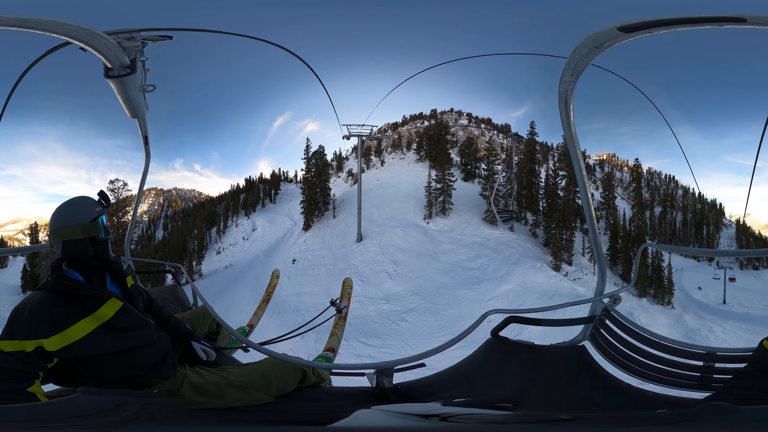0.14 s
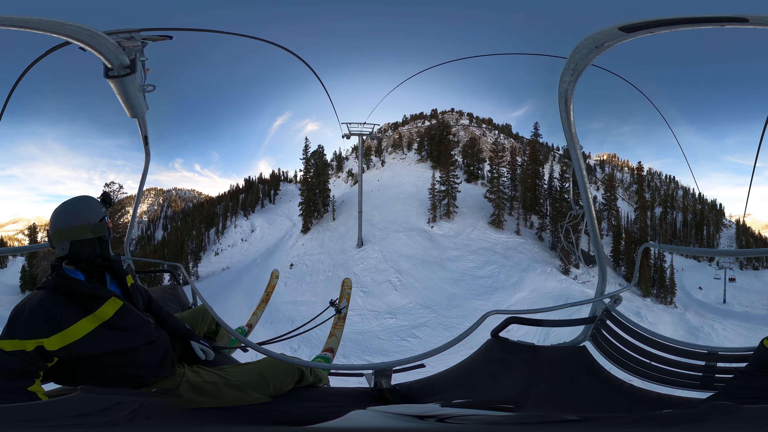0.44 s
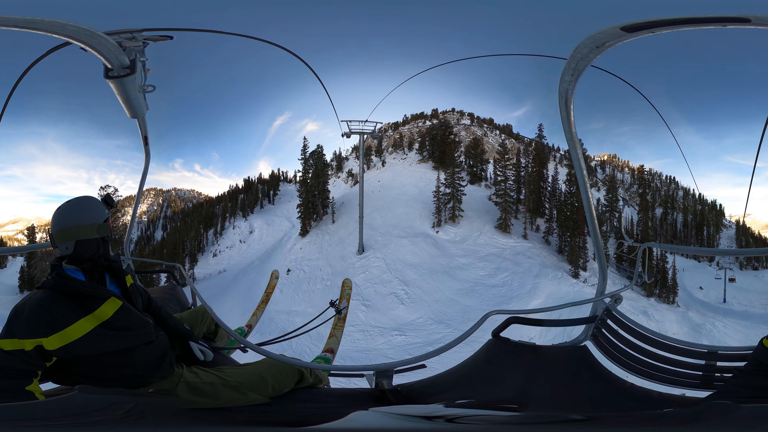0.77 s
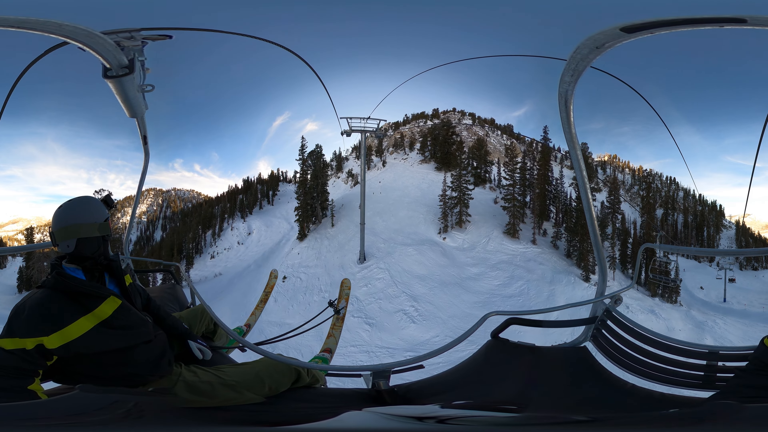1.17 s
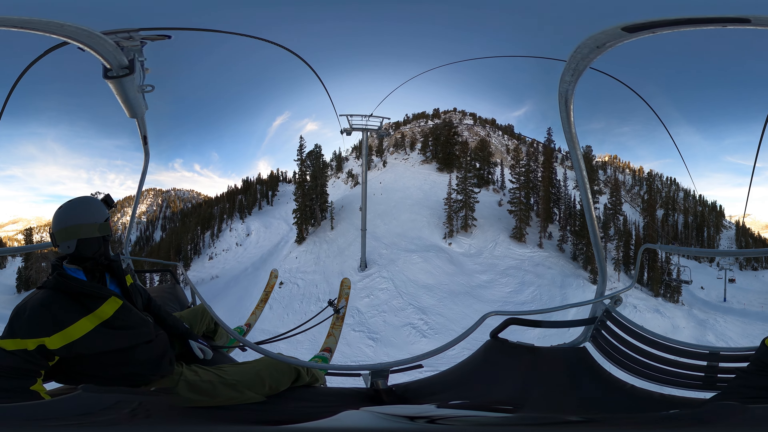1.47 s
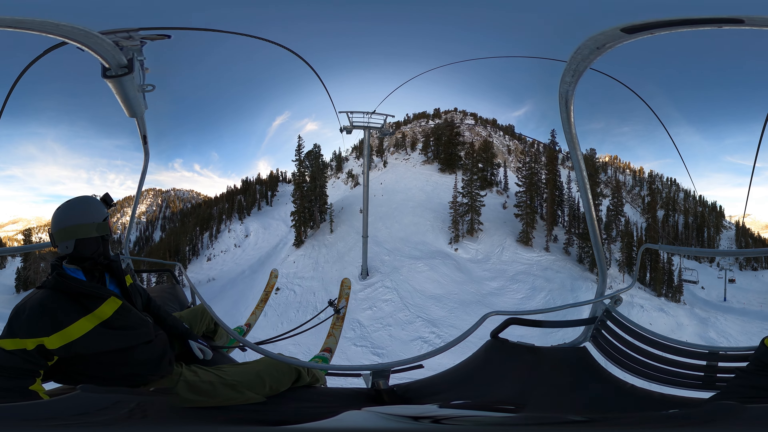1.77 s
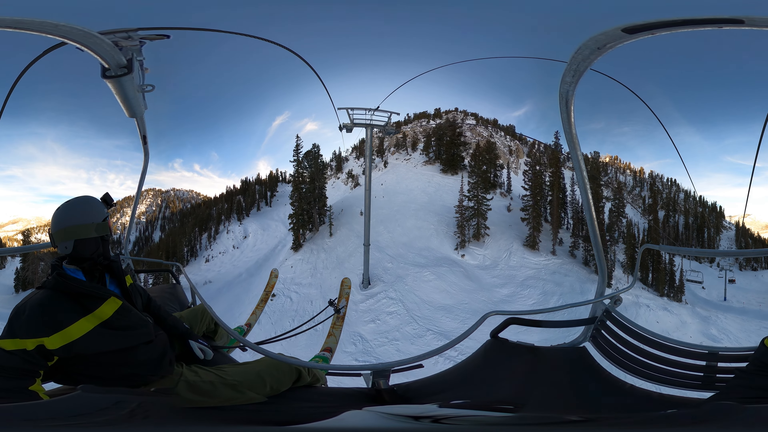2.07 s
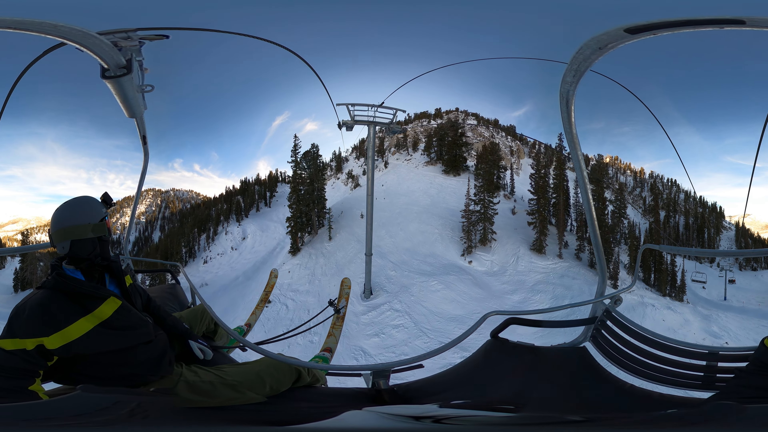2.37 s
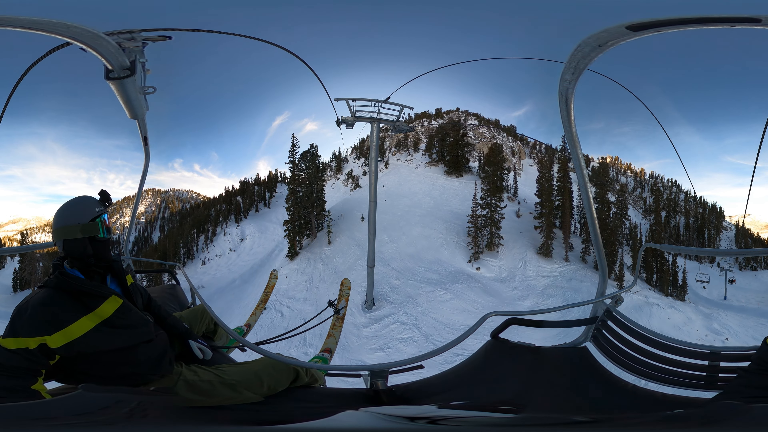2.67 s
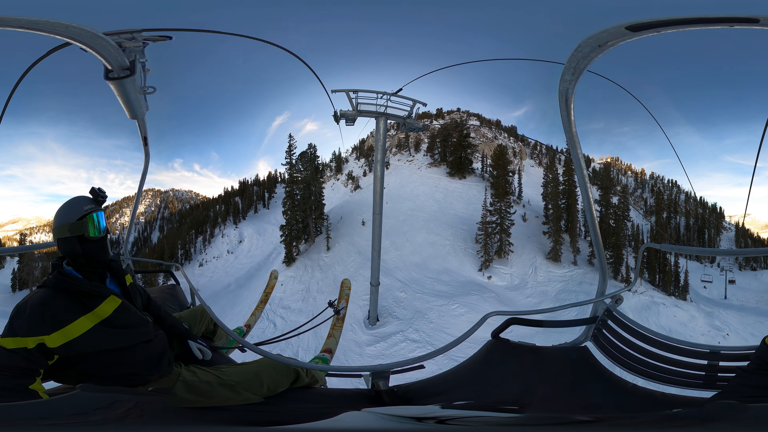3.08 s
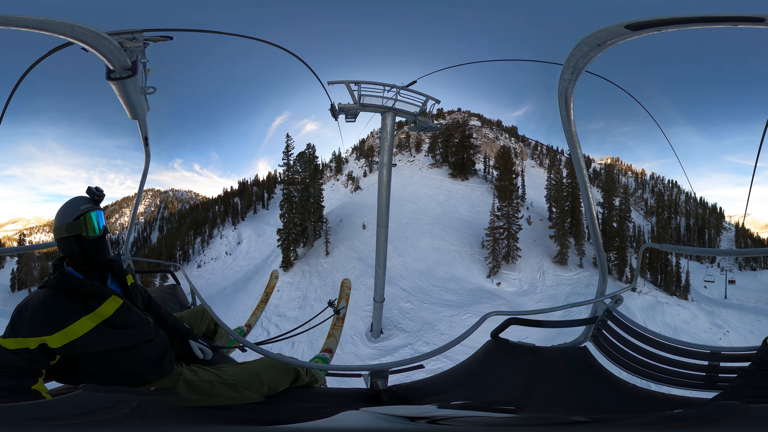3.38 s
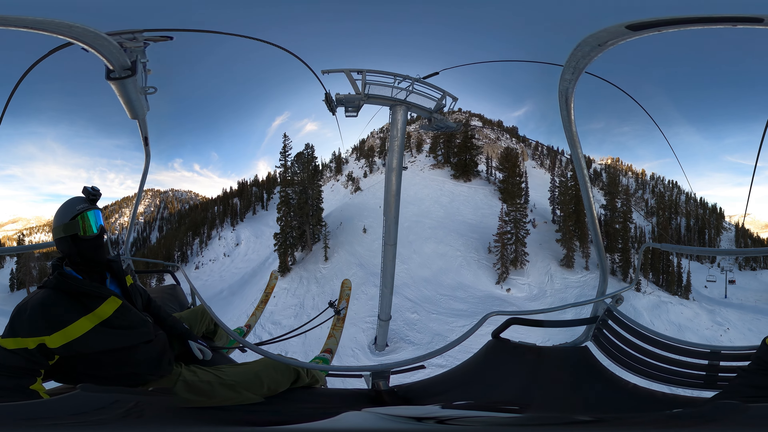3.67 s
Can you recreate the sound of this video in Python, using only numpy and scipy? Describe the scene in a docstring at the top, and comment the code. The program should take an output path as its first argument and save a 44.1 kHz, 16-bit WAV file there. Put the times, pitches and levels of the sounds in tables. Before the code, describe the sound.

A chairlift drones through buffeting wind, its roller hum swelling as a jacket rustles.

```python
"""A chairlift seat glides up a snowy slope. From the start, wind buffets the microphone over the drone
of the rope-shaken chair and a soft rolling rush. Gear knocks lightly on the chair in the first half
second, and a rider's nylon jacket brushes and crinkles, busiest around 1.5 s. From 2 s the hum of the
haul rope running over the tower's rollers swells on one pitch as the tower nears.
In the last half second, close to the tower, the rope's hiss rises."""
import sys
import numpy as np
from scipy import signal
from scipy.fft import rfft, irfft, next_fast_len
from scipy.io import wavfile
from scipy.ndimage import uniform_filter1d

SR = 44100
rng = np.random.default_rng(int(sys.argv[2]) if len(sys.argv) > 2 else 0)


def waveform_to_disk(signal):
    """Save audio, clipped to [-1, 1], as 16-bit WAV at the path in sys.argv[1]."""
    frames = np.transpose(np.atleast_2d(signal))
    scaled = np.clip(frames, -1, 1) * 32767
    samples = np.round(scaled).astype(np.int16)
    wavfile.write(sys.argv[1], SR, samples)


N = 168903
T = np.arange(N) / SR
FFT_SIZE = 2 * next_fast_len(N)
FFT_HZ = np.fft.rfftfreq(FFT_SIZE, 1 / SR)
UNSTEADY_HZ = 13  # how fast the tones flicker


def amp(db):
    """Decibels to gain."""
    return 10 ** (np.asarray(db) / 20)


def unit(x):
    """Scales to rms 1."""
    return x / np.sqrt(np.mean(abs(x) ** 2) + 1e-30)


def fader(points):
    """Gain ride through points (t/s, level/dB)."""
    return amp(np.interp(T, *np.transpose(points)))


def swells(rows):
    """Envelope of bell-shaped swells (t/s, half-length/s, level/dB)."""
    return sum(amp(db) * np.exp(-((T - s) / half_s) ** 2 / 2) for s, half_s, db in rows)


def bursts(rows, attack_s, decay_s):
    """Envelope of hits (t/s, level/dB): linear attack, exponential tail."""
    return sum(amp(db) * np.clip((T - s) / attack_s, 0, 1)
               * np.exp(-np.maximum(T - s - attack_s, 0) / decay_s) for s, db in rows)


def colour(x, eq):
    """Shapes x with an EQ curve (f/Hz, level/dB), then scales to rms 1."""
    hz, db = np.transpose(eq)
    gain = amp(np.interp(np.log(FFT_HZ + 1), np.log(hz), db))
    return unit(irfft(rfft(x, FFT_SIZE) * gain)[:N])


def drift(rate_hz):
    """Smooth random modulation of rms 1, up to about the given rate."""
    white = rfft(rng.standard_normal(FFT_SIZE))
    return unit(irfft(white / (1 + (FFT_HZ / rate_hz) ** 4))[:N])


def noise(eq, grain_db=0, grain_hz=None):
    """Coloured noise of rms 1, optionally roughened by a random tremolo."""
    white = rng.standard_normal(N)
    return colour(white * amp(grain_db * drift(grain_hz)) if grain_db else white, eq)


def band(hz, width_hz):
    """Narrow noise around one frequency."""
    phase = 2 * np.pi * hz * T
    return unit(drift(width_hz / 2) * np.cos(phase) + drift(width_hz / 2) * np.sin(phase))


def tone(clock, hz, unsteady):
    """A sine blended with narrow noise; unsteady is the noise's share of the power."""
    sine = np.sin(2 * np.pi * (hz * clock + rng.random()))
    return np.sqrt(2 * (1 - unsteady)) * sine + np.sqrt(unsteady) * band(hz, 2 * UNSTEADY_HZ)


def eddies(eq, evenness=0.9, span_s=0.035):
    """Turbulence of rms 1: noise compressed so that one eddy follows another without long gaps."""
    x = noise(eq)
    span = int(span_s * SR)
    power = uniform_filter1d(uniform_filter1d(x ** 2, size=span), size=span)
    return unit(x / (abs(power) + 1e-6) ** (evenness / 2))


# wind bed, deep rumble and quicker flutter: t/s, level/dB
RUMBLE_RIDE = [(0, -42), (.1, -33), (.8, -33.5), (1.1, -36.5), (1.5, -33), (1.9, -35.5), (2.3, -37),
               (2.7, -36.5), (3.1, -40), (3.3, -34.5), (3.43, -44.5), (3.83, -44.5)]
FLUTTER_RIDE = [(0, -55), (.08, -44.5), (.17, -47), (.4, -43.5), (.7, -42), (.95, -46.5), (1.15, -39.5),
                (1.38, -40), (1.6, -42.5), (1.98, -45.5), (2.15, -43), (2.35, -36), (2.55, -39),
                (2.87, -44), (3.25, -41.5), (3.6, -46), (3.83, -42.5)]
# their tone: f/Hz, level/dB
RUMBLE_EQ = [(5, -20), (18, -1.5), (28, 1.5), (42, -0.5), (60, -1.5), (80, -8), (110, -30), (170, -33.5),
             (400, -62), (1500, -87.5)]
FLUTTER_EQ = [(40, -14), (75, -6.5), (108, 4.5), (130, -6.5), (150, -13), (175, -29.5), (260, -34),
              (600, -49.5), (2000, -91)]
# gusts on top of the bed: t/s, half-length/s, rumble level/dB, flutter level/dB
WIND_GUSTS = [(0.246, 0.023, -25, -39), (0.313, 0.018, -31, -41), (0.355, 0.008, -32.5, -46),
              (0.476, 0.023, -24.5, -41.5), (0.567, 0.0064, -26, -33), (0.627, 0.022, -36.5, -30),
              (0.692, 0.025, -24, -41), (0.792, 0.025, -37, -37), (1.197, 0.031, -43, -40.5),
              (1.36, 0.02, -28, -56), (1.405, 0.0034, -27, -30.5), (1.468, 0.014, -32, -30),
              (1.545, 0.013, -36, -29), (1.707, 0.014, -31.5, -34.5), (2.182, 0.0094, -28, -39),
              (2.251, 0.019, -27, -34.5), (2.441, 0.027, -26.5, -38.5), (3.182, 0.0074, -35, -34),
              (3.351, 0.046, -33.5, -37.5)]
# brief dips between eddies, and one small lift: t/s, half-length/s, level/dB
WIND_LULLS = [(0.137, 0.0082, -5.5), (0.424, 0.0063, 2.5), (0.602, 0.0072, -14), (1.065, 0.041, -3.5),
              (1.26, 0.0081, -10), (1.387, 0.011, -7), (1.644, 0.0084, -6.5), (1.784, 0.043, -2.5),
              (2.0, 0.009, -16), (2.58, 0.02, -2.5), (2.857, 0.0083, -1), (3.45, 0.02, -2)]


def wind():
    """Eddies hit the microphone as rumble and flutter, pushed by gusts and ducked by lulls."""
    rumble_gusts = swells((s, half_s, db) for s, half_s, db, _ in WIND_GUSTS)
    flutter_gusts = swells((s, half_s, db) for s, half_s, _, db in WIND_GUSTS)
    rumble = np.hypot(fader(RUMBLE_RIDE), rumble_gusts) * eddies(RUMBLE_EQ)
    flutter = np.hypot(fader(FLUTTER_RIDE), flutter_gusts) * eddies(FLUTTER_EQ)
    duck_db = sum(db * np.exp(-((T - s) / half_s) ** 2 / 2) for s, half_s, db in WIND_LULLS)
    return amp(duck_db) * (rumble + flutter)


# roller hum (3rd harmonic of the strand rate) and whine (8th): t/s, level/dB
HUM_RIDE = [(0, -58.5), (.3, -58.5), (.6, -69), (1.2, -64.5), (1.8, -64.5), (2.05, -56), (2.27, -48),
            (2.52, -51), (2.72, -49.5), (3.0, -46), (3.25, -44), (3.5, -47.5), (3.83, -50)]
WHINE_RIDE = [(0, -101), (1.95, -89.5), (2.2, -66.5), (2.32, -60), (2.46, -71), (2.65, -65.5),
              (2.85, -74.5), (3.1, -63), (3.3, -75.5), (3.45, -76), (3.83, -81)]
# faint overtones, each swelling once: harmonic, level/dB, peak t/s, half-length/s, unsteadiness/0-1
OVERTONES = [(5, -75, 2, 0.27, 1), (9, -78, 2.9, 0.26, 0), (11, -70.5, 2.28, 0.25, 0.4),
             (12, -77, 3.1, 1, 0), (13, -77.5, 2.8, 0.95, 0.8), (18, -82, 3.0, 0.66, 0.99),
             (19, -87.5, 2.6, 0.77, 1)]
# pitches of the singing rollers: f/Hz
SING_PITCHES = (731.6, 1052)
# one swell for each pitch: level/dB, peak t/s, half-length/s, unsteadiness/0-1
SING_SWELLS = [(-65.5, 3.22, 0.18, 0.1), (-73, 1.9, 0.063, 0.7)]
STRAND_HZ = 106.56
WOW_DEPTH, WOW_HZ = 0.00067, 8.7  # depth as a fraction of the pitch


def rollers():
    """Rope strands run over the rollers: hum, whine and overtones, while two rollers briefly sing."""
    clock = T + WOW_DEPTH * np.cumsum(drift(WOW_HZ)) / SR
    voices = []
    for harmonic, ride, flicker_db in ((3, HUM_RIDE, 0.25), (8, WHINE_RIDE, 0.61)):
        sine = np.sqrt(2) * np.sin(2 * np.pi * harmonic * STRAND_HZ * clock)
        voices.append(fader(ride) * sine * amp(flicker_db * drift(UNSTEADY_HZ)))
    overtones = [(harmonic * STRAND_HZ, swell) for harmonic, *swell in OVERTONES]
    singing = list(zip(SING_PITCHES, SING_SWELLS))
    for hz, (db, peak_s, half_s, unsteady) in overtones + singing:
        envelope = amp(db) / (1 + ((T - peak_s) / half_s) ** 2)
        voices.append(envelope * tone(clock, hz, unsteady))
    return sum(voices)


# resonances of the chair frame: f/Hz, width/Hz, level/dB relative to the ride
FRAME_MODES = [(181, 12, -12.5), (217.5, 36, -8.5), (321, 6, -14), (338, 42, -11), (367.6, 23, -10),
               (420.4, 37, -17), (510, 95, -16.5), (743, 34, -23), (1043, 48, -25), (1367, 16, -28)]
# the frame's drone: t/s, level/dB
DRONE_RIDE = [(0, -55.5), (.35, -56), (.7, -63), (1.2, -60.5), (1.8, -58.5), (2.3, -56), (2.8, -58.5),
              (3.2, -55), (3.55, -56), (3.83, -56.5)]


def chair_frame():
    """Shaken by the rope, the frame hums low and drones in its resonances."""
    hum = amp(-3) * tone(T, hz=217, unsteady=0.27)
    resonances = sum(amp(db) * band(hz, width_hz) for hz, width_hz, db in FRAME_MODES)
    return fader(DRONE_RIDE) * (hum + resonances)


# rolling rush and airy hiss: t/s, level/dB
RUSH_RIDE = [(0, -59), (.2, -63), (.55, -66.5), (1.08, -69.5), (1.35, -58), (1.7, -61.5), (2.3, -59),
             (2.8, -61.5), (3.25, -56), (3.5, -59), (3.83, -59)]
AIR_RIDE = [(0, -78), (.4, -76.5), (.55, -80.5), (1.1, -79.5), (1.25, -77), (1.4, -74), (1.8, -76),
            (2.5, -75.5), (3.3, -74), (3.7, -74), (3.83, -73)]
# their tone: f/Hz, level/dB
RUSH_EQ = [(100, 0), (200, 8), (330, 7.5), (470, -4.5), (660, -2), (820, -10), (950, -11.5), (1150, -8),
           (1350, -10.5), (1650, -9.5), (2100, -29.5), (3000, -26), (6000, -56)]
AIR_EQ = [(500, -6), (1800, 4.5), (2600, 1), (3400, 0), (4200, -2), (5500, -4), (7000, -10), (8300, -29.5),
          (9500, -25.5)]


def rolling_bed():
    """The soft, dark rush of the rolling lift, with thin air on top."""
    rush = fader(RUSH_RIDE) * noise(RUSH_EQ, grain_db=1.27, grain_hz=23.4)
    air = fader(AIR_RIDE) * noise(AIR_EQ, grain_db=1.27, grain_hz=10)
    return rush + air


# crackle of the jacket: t/s, level/dB
CRACKLE_RIDE = [(0, -84.5), (.3, -73), (.5, -90), (1.1, -91), (1.3, -78.5), (1.5, -70.5), (1.65, -71.5),
                (1.85, -77.5), (2.2, -73), (2.45, -105)]
# its tone: f/Hz, level/dB
CRACKLE_EQ = [(400, -8.5), (1000, 2), (1550, 9), (2100, 1.5), (3500, -9), (5500, -14), (7500, -21),
              (10000, -46.5)]


def jacket_crackle(grains_per_s=120, spread_db=1.5, decay_s=0.00175):
    """Moving cloth sheds a random scatter of tiny noise grains."""
    triggers = rng.random(N) < grains_per_s / SR
    clicks = triggers * amp(spread_db * np.minimum(rng.exponential(1, N), 2))
    envelope = signal.lfilter([1], [1, -np.exp(-1 / (decay_s * SR))], clicks)
    return fader(CRACKLE_RIDE) * colour(envelope * rng.standard_normal(N), CRACKLE_EQ)


# light strokes on nylon: peak t/s, level/dB, rise and fall/s
BRUSH_CUES = [(0.061, -72.5, 0.0062), (0.245, -62.5, 0.0047), (0.27, -73, 0.01), (.357, -77.5, 0.0068),
              (0.39, -69.5, 0.0063), (.404, -72.5, .008), (.4655, -72.5, 0.01)]
# their bright tone: f/Hz, level/dB
BRUSH_EQ = [(600, 0), (1800, 3.5), (3000, 0), (4500, 6), (6000, 4.5), (7000, -1), (8200, -1.5),
            (10000, -27)]


def jacket_brushes():
    """Glancing touches of nylon give short, gritty flicks."""
    strokes = sum(amp(db) * np.exp(-abs(T - s) / fade_s) for s, db, fade_s in BRUSH_CUES)
    return strokes * noise(BRUSH_EQ, grain_db=4, grain_hz=500)


# gear hitting the chair: t/s, level/dB
KNOCK_CUES = [(.0615, -49.5), (.0735, -56.5), (.3835, -63)]
# tone of the tick: f/Hz, level/dB
TICK_EQ = [(150, 5), (500, 16), (800, 9.5), (1100, 3), (2000, -3.5), (3500, -7), (5500, -11), (7000, -29.5),
           (11000, -23)]
# the gear's ring: f/Hz, level/dB relative to the tick, decay/s
GEAR_MODES = [(490, 2, 0.0044), (613, 6, 0.0063), (723, 0, .006), (823, -3, 0.0036), (1085, -8, 0.0043)]


def gear_knocks(attack_s=0.0019):
    """Gear taps the chair: a noisy tick and a short hollow ring."""
    tick = bursts(KNOCK_CUES, attack_s, decay_s=0.0069) * noise(TICK_EQ, grain_db=-2, grain_hz=404)
    ring = sum(bursts([(s, db + mode_db)], attack_s, decay_s) * np.sin(2 * np.pi * hz * (T - s))
               for s, db in KNOCK_CUES for hz, mode_db, decay_s in GEAR_MODES)
    return tick + ring


# nylon slides: t/s, half-length/s, f/Hz, width/Hz, level/dB
SWISH_CUES = [(0.107, 0.046, 2590, 890, -76), (0.192, 0.014, 1813, 306, -70),
              (0.305, 0.037, 1685, 250, -81.5), (1.982, 0.013, 1750, 1000, -67),
              (2.012, 0.042, 2700, 1110, -77), (2.22, 0.038, 2590, 1100, -74.5)]


def jacket_swishes():
    """Nylon slides on nylon, each pass a swell of loosely pitched noise."""
    return sum(swells([(s, half_s, db)]) * band(hz, width_hz) for s, half_s, hz, width_hz, db in SWISH_CUES)


# sleeve moves: t/s, half-length/s, level/dB
RUB_CUES = [(0.11, 0.023, -67), (1.49, 0.016, -64), (1.614, 0.0025, -55.5), (1.645, 0.012, -60),
            (1.8, 0.2, -72.5)]
# their dull tone: f/Hz, level/dB
RUB_EQ = [(250, -4), (550, 9), (1000, 4.5), (1700, 2.5), (2400, -8), (4000, -16), (7000, -42), (10000, -52)]


def sleeve_rubs():
    """A rubbing sleeve makes rough midrange scuffs."""
    return swells(RUB_CUES) * noise(RUB_EQ, grain_db=-2, grain_hz=69)


# creases giving way: t/s, body level/dB, snap level/dB
CREASE_CUES = [(.189, -68, -79), (0.259, -64, -63), (0.9577, -69, -71.5), (1.137, -63, -68),
               (1.144, -67, -66.5), (1.269, -63, -67), (1.3, -56, -59.5), (1.308, -63, -65),
               (1.409, -61, -68), (1.424, -60, -70), (1.445, -53, -66), (1.4536, -69.5, -65),
               (1.542, -62, -74), (1.56, -58, -72.5), (1.611, -62.5, -72.5), (1.7155, -61, -62),
               (1.7895, -65, -65), (1.831, -64, -67), (1.965, -65.5, -68), (2.1685, -67, -76)]
# tone of body and snap: f/Hz, level/dB
BODY_EQ = [(400, -5.5), (1100, -7), (1400, 6.5), (1600, 12), (1850, 2.5), (2200, -8), (3800, -19.5),
           (7500, -33.5), (10000, -48)]
SNAP_EQ = [(600, -7.5), (1800, -0.5), (2400, 2.5), (3000, -2), (3500, 0.5), (4500, -11), (6500, -15.5),
           (8500, -24), (10000, -40.5)]


def jacket_creases(attack_s=0.001):
    """Stiff cloth buckles: each crease is a bright snap and a papery body."""
    body = bursts([(s, db) for s, db, _ in CREASE_CUES], attack_s, decay_s=0.008)
    snap = bursts([(s, db) for s, _, db in CREASE_CUES], attack_s, decay_s=0.0035)
    return body * noise(BODY_EQ) + snap * noise(SNAP_EQ)


# rope hiss building near the tower: t/s, level/dB
ROPE_RIDE = [(0, -100), (2.6, -84.5), (3.3, -83), (3.65, -68.5), (3.83, -67.5)]
# its tone: f/Hz, level/dB
ROPE_EQ = [(350, -10), (580, 16.5), (850, -14), (2300, -11.5), (3300, -0.5), (4300, -9), (6000, -16.5),
           (8500, -26.5), (10000, -30.5)]


def rope_hiss():
    """The running rope's smooth hiss fades up close to the tower."""
    return fader(ROPE_RIDE) * noise(ROPE_EQ)


def scene():
    """Mono mix of wind, lift and rider at one microphone."""
    beds = wind() + rollers() + chair_frame() + rolling_bed()
    foley = jacket_crackle() + jacket_brushes() + gear_knocks()
    foley += jacket_swishes() + sleeve_rubs() + jacket_creases()
    return (beds + foley + rope_hiss())[None]


def record(dry, cutoff_hz=9000):
    """A steep low-pass takes the top off the mix."""
    lowpass = signal.firwin(255, cutoff_hz, window=("kaiser", 8), fs=SR)
    return signal.oaconvolve(dry, lowpass[None], "same")


dry = scene()
out = record(dry)
waveform_to_disk(out)
```